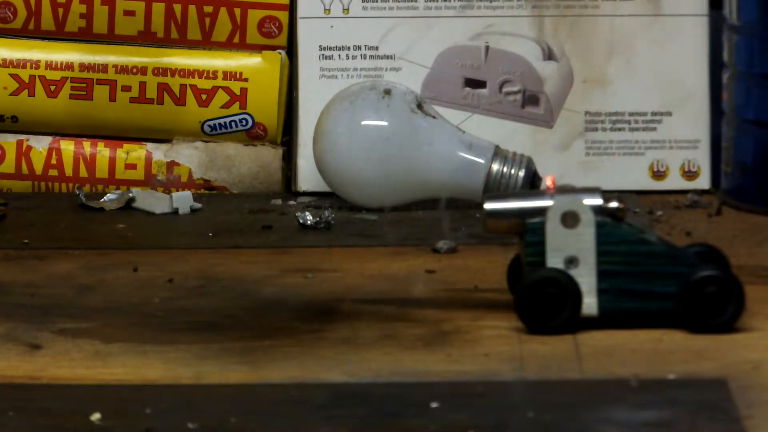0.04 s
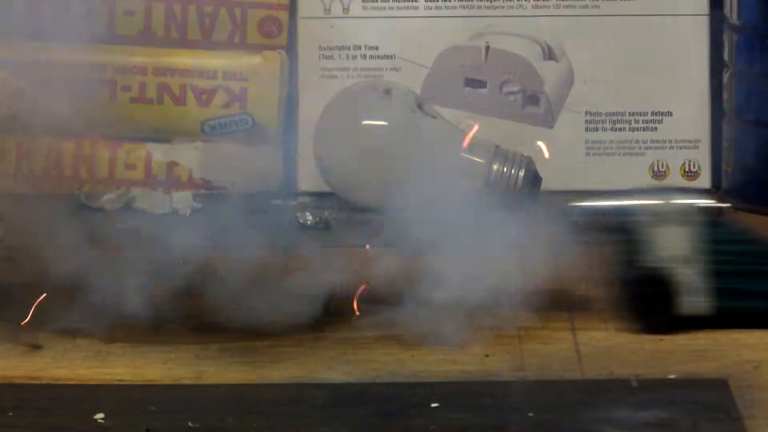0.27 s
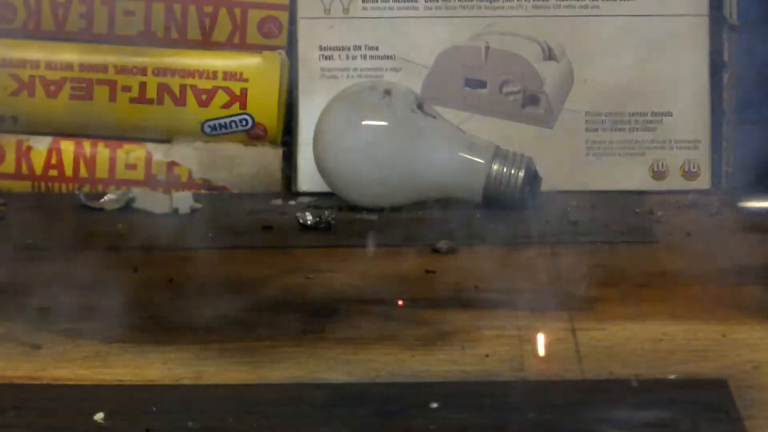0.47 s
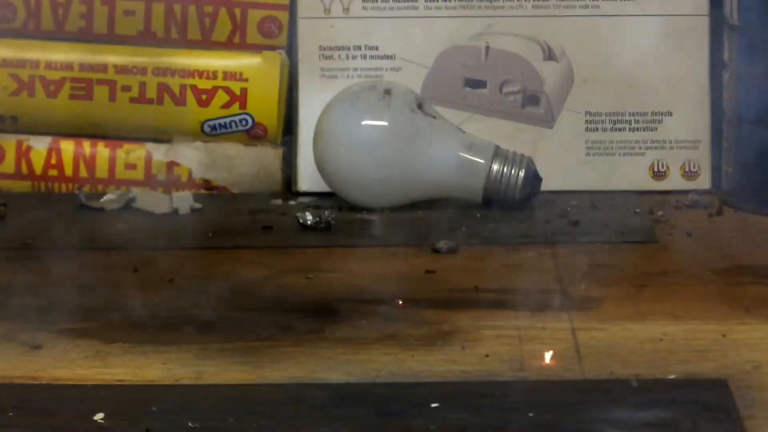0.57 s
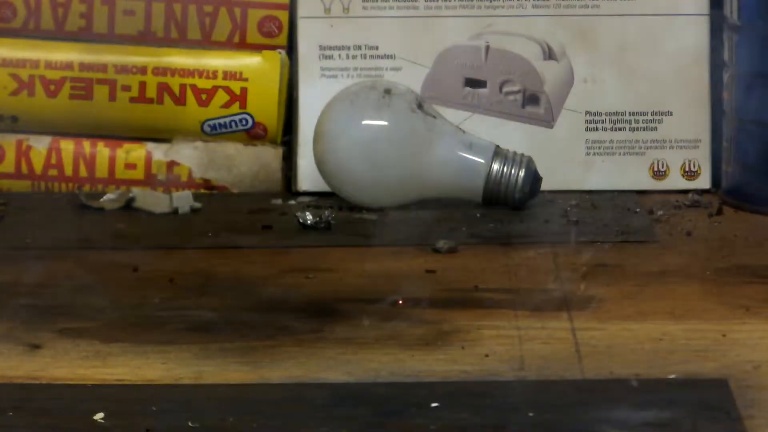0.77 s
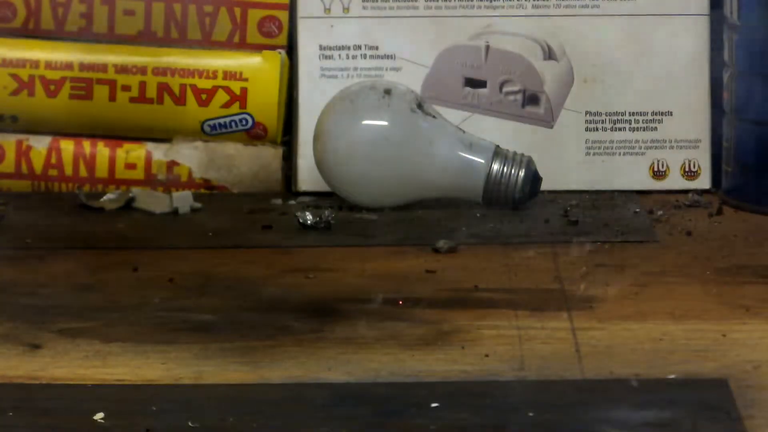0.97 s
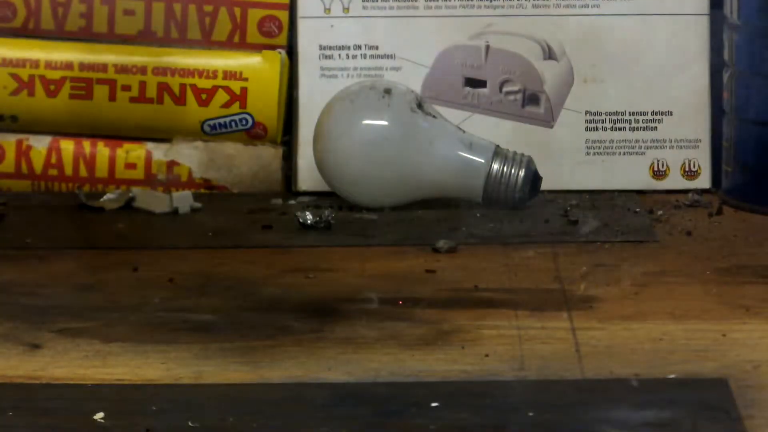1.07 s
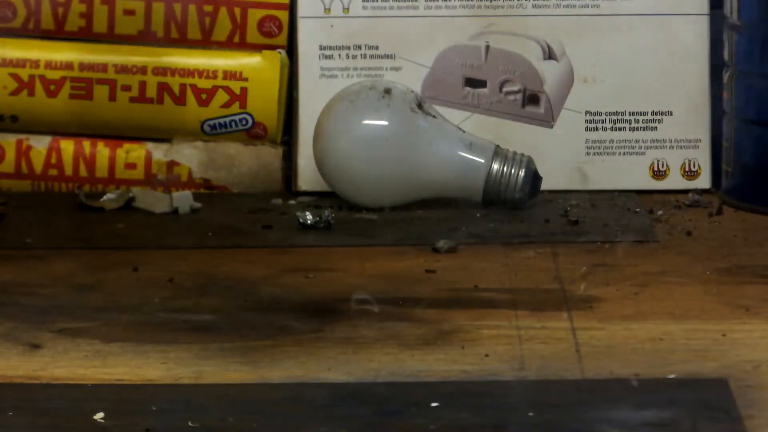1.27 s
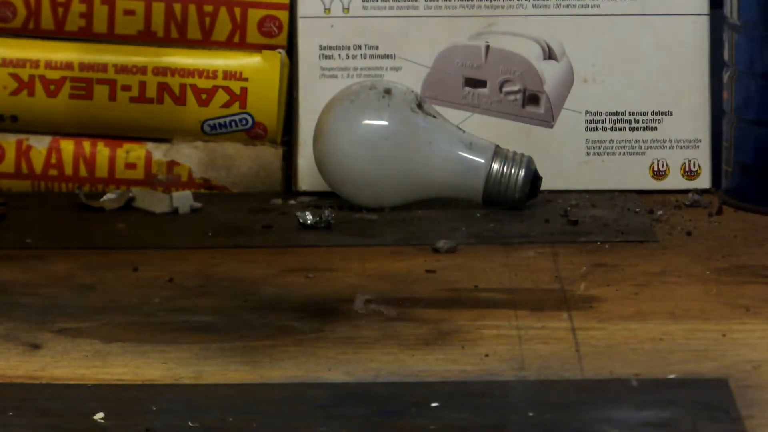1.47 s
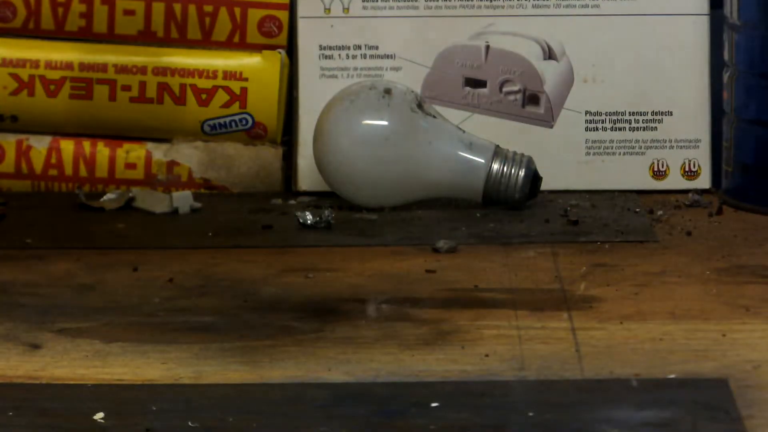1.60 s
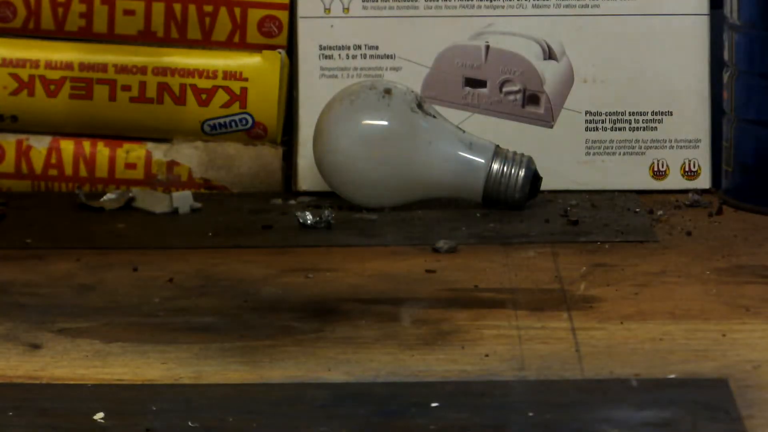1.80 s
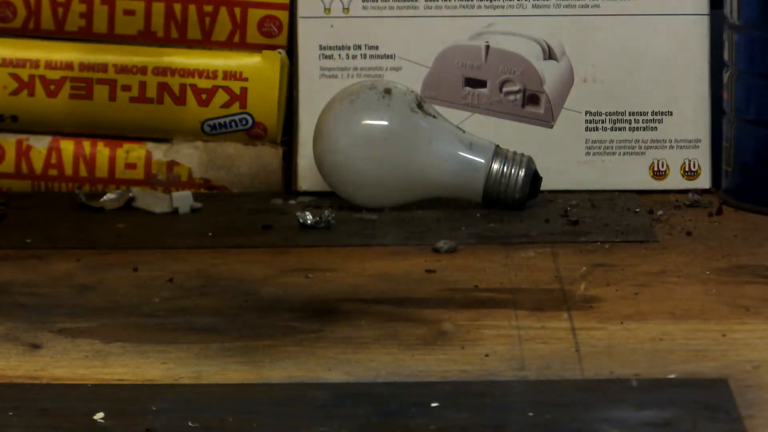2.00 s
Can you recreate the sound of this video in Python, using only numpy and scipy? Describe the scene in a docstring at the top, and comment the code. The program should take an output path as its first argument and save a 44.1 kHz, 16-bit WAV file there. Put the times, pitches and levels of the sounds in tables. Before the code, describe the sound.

A toy cannon fires one loud, slightly distorted bang on a workshop bench, close to the microphone, after a brief faint fuse fizz. A low boom fades through the room while sparks tick, metal chinks and embers hiss.

```python
"""A toy black-powder cannon on a workshop bench, close to a camera's stereo microphone.
First the fuse fizzes and pops twice over faint room tone. Gas jets out, and at once the blast
overloads the input; the gain control ducks, then recovers as a long boom fills the room and a low
hum swells and sinks. While the boom dies, sparks and grit tick on the bench, a bit of metal
chinks three times and the embers hiss away."""
import sys
import numpy as np
from scipy import signal
from scipy.fft import rfft, irfft
from scipy.io import wavfile
from scipy.ndimage import uniform_filter1d

SR = 44100
rng = np.random.default_rng(int(sys.argv[2]) if len(sys.argv) > 2 else 0)


def materialize(psi):
    """Save the field psi as 16-bit PCM at rate SR to the path in sys.argv[1].

    A 1-D psi becomes a single channel; in a 2-D psi each row is a channel.
    """
    bounded = np.clip(np.atleast_2d(psi).T, -1, 1)
    quanta = np.round(bounded * 32767).astype(np.int16)
    wavfile.write(sys.argv[1], SR, quanta)


N = 90404
SHOT_S = .2245

# Spectra of the noise layers: (frequency [Hz], relative density [dB])
ROOM_TONE_COLOUR = [(18, -44), (30, -1), (127, -5.5), (156, -1.5), (188, -9.5), (264, 4), (879, -9),
                    (1520, -9.5), (1880, -9.5), (3090, -16.5), (15600, -31.5)]
BOOM_COLOUR = [(24, -61), (40, -54), (127, -21), (153, -8.5), (253, -8.5), (401, 2.5), (836, -1.5),
               (1120, -13), (1890, -21), (2700, -33.5), (6000, -32.5), (7800, -70), (13200, -120)]
CRACK_COLOUR = [(100, -19.5), (500, -6.5), (1000, -2), (4000, -11), (8000, -7), (15800, -29)]
BLAST_COLOUR = [(24, -48), (40, -18), (162, -22), (302, -1.5), (707, -1.5), (954, -4), (1190, -2),
                (2180, -12), (11000, -18), (15600, -21)]
FIZZ_COLOUR = [(2000, -30), (5000, 2), (9000, 4.5), (15800, 2)]
# Likeness of left and right at the microphone: (frequency [Hz], correlation [0-1])
AIR_LIKENESS = [(60, 0.65), (150, 0.75), (380, 0.83), (950, 0.57), (2380, 0.45), (5980, 0.21), (15000, 1)]
BOOM_LIKENESS = [(60, 0.42), (180, 0.88), (550, 0.99), (1650, 1), (4970, 0.25), (15000, 1)]
BLAST_LIKENESS = [(60, 0.94), (180, 0.91), (550, 0.99), (1650, 1), (4970, 0.95), (15000, 0.9)]
CRACK_LIKENESS = [(40, 0), (16000, 0)]
# Time each band takes to fall 60 dB: (frequency [Hz], t60 [s])
BOOM_DECAY = [(60, 1.3), (160, 3.25), (400, 2.1), (800, 2.07), (1500, 2.14), (4000, 1.43)]
BLAST_DECAY = [(60, 0.22), (300, 0.4), (1000, 0.98), (2000, 0.99), (3000, 0.73), (5000, 0.67), (8000, 0.59),
               (15000, 0.28)]
# Hiss, one list for the fuse and one for the embers: (time [s], level [dB])
FIZZ_LEVELS = [
    [(0, -55), (.21, -55.5)],
    [(.6, -54), (.7, -51), (.8, -58), (1.02, -59.5), (1.15, -64), (1.24, -58), (1.31, -61), (1.4, -54),
     (1.48, -56.5), (1.55, -60), (1.7, -60.5), (1.81, -63.5), (2.05, -68)],
]
# Fuse pops and metal chinks: (time [s], level [dB])
FUSE_POPS = [(0.0121, -33), (0.112, -32.5)]
METAL_CHINKS = [(0.5616, -26), (0.6714, -35), (0.6928, -27.5)]
# Their resonances: (frequency [Hz], level [dB], t60 [s])
POP_MODES = [(1620, -0.5, .012), (3200, 2.5, .012), (3830, 0, 0.0069), (8440, 0, 0.0054)]
CHINK_MODES = [(5400, -1.5, 0.12), (5970, -1.5, 0.082), (6200, -9, 0.061), (8100, -12, 0.055)]
# Sparks and grit on the bench: (time [s], level [dB], left minus right [dB], brightest frequency [Hz])
GRIT_TICKS = [(.544, -27, 0, 13200), (0.639, -29, -1, 11000), (0.649, -43, 4, 13940),
              (0.726, -33.5, 0, 13000), (0.811, -41, 0.5, 8860), (.865, -47, 5, 9300), (.9, -44, 5, 8430),
              (0.963, -41, -1.5, 7440), (1.05, -31.5, 2, 9000), (1.101, -37.5, 7, 11400),
              (1.18, -39, -9, 12030), (1.194, -35, -4, 3860), (1.222, -41, 8, 7900), (1.238, -39, 0, 8600),
              (1.253, -39.5, -3, 4940), (1.294, -44, 0, 9080), (1.327, -36.5, 3, 7100),
              (1.4, -48, -2, 9000), (1.414, -46, 5, 8400), (1.464, -51.5, -2, 13200),
              (1.7315, -40.5, -1, 3000), (1.821, -46, -2, 8600)]
# Course of the low hum: (time [s], frequency [Hz], level [dB])
HUM_PATH = [(0.0, 152.6, -58), (0.11, 161.8, -54), (0.21, 171.7, -59), (0.23, 176, -36), (0.23, 179, -28),
            (0.3, 172.5, -36), (0.36, 163.6, -45), (0.51, 156.6, -24), (0.59, 160.4, -29.5),
            (0.7, 163.1, -39.5), (0.81, 163, -35.5), (0.99, 159.2, -45.5), (1.07, 158.0, -37),
            (1.14, 158, -49.5), (1.2, 159, -46), (1.29, 156.5, -58.5), (1.35, 158.7, -40),
            (1.53, 155.4, -52.5), (1.62, 160.3, -48.5), (1.82, 169.8, -60), (1.9, 159.8, -48),
            (2.05, 158.1, -48)]
# Soft puffs: (time [s], length [s], level [dB], low edge [Hz], high edge [Hz])
NOISE_PUFFS = [(.232, .07, -5, 300, 1970), (.36, .16, -20, 570, 3860), (1.46, .1, -51, 900, 2400),
               (1.68, .16, -48, 88, 120), (0.53, 0.11, -34, 63, 120)]
# Resonances of the workshop: (frequency [Hz], width [Hz], level [dB])
ROOM_MODES = [(105.8, 2.7, -14), (265.5, 4.5, -8.5), (297.6, 5.3, -5), (360.5, 3.4, 3), (406.5, 2.9, 4.5),
              (449.3, 7.4, 1), (498, 1.7, 2), (547, 3.6, 0), (591, 5.5, 2.5), (603.3, 2.2, -0.5),
              (634.5, 7.2, 0.5), (675, 6, -3), (784.5, 7.4, -6.5), (839.6, 3.8, -4)]
# Swells of the boom on top of its decay: (time [s], level [dB])
BOOM_SWELLS = [(.23, -9), (.3, -9), (.4, -13.5), (.52, -4.5), (.62, -7.5), (.75, -8), (.8, -12),
               (1.05, -8.5), (1.12, -11), (1.45, -8), (1.52, -5), (1.62, -6.5), (2.05, -4.5)]


def amp(db):
    return 10 ** (np.asarray(db) / 20)


def unit_rms(x):
    return x / np.sqrt(np.mean(x ** 2) + 1e-20)


def over_frequency(points, hz):
    f, value = np.transpose(points)
    return np.interp(np.log(hz + 1), np.log(f + 1), value)


def over_time(points):
    s, value = np.transpose(points)
    return np.interp(np.arange(N) / SR, s, value)


def add(mix, start_s, sound):
    part = mix[..., round(start_s * SR):][..., :sound.shape[-1]]
    part += sound[..., :part.shape[-1]]


def noise_field(colour, likeness, decay=None, flicker_db=0., size=256):
    """Coloured stereo noise; given a decay table, each band dies from the first sample on."""
    hop = size // 4
    frames, hz = N // hop + 5, np.fft.rfftfreq(size, 1 / SR)
    a, b, c, d, flicker = rng.standard_normal((frames, len(hz), 5)).T
    shared = over_frequency(likeness, hz)[:, None]
    left = a + 1j * b
    right = shared * left + np.sqrt(1 - shared ** 2) * (c + 1j * d)
    flicker = unit_rms(uniform_filter1d(uniform_filter1d(flicker, 8, axis=0), 6, axis=1))
    bands = np.array([left, right]) * amp(over_frequency(colour, hz)[:, None] + flicker_db * flicker)
    rms = np.sqrt(np.mean(signal.istft(bands, nperseg=size, noverlap=size - hop)[1] ** 2))
    if decay:
        bands *= amp(-60 * np.arange(frames) * hop / SR / over_frequency(decay, hz)[:, None])
    return signal.istft(bands, nperseg=size, noverlap=size - hop)[1][:, :N] / rms


def room_tone():
    """The faint, mostly low noise of the workshop around the microphone."""
    return amp(-51) * noise_field(ROOM_TONE_COLOUR, AIR_LIKENESS, flicker_db=1.5, size=1024)


def fizz():
    """The burning fuse, and later the embers, give a thin flickering hiss."""
    fuse, embers = FIZZ_LEVELS
    return amp(over_time(fuse + embers)) * noise_field(FIZZ_COLOUR, AIR_LIKENESS, flicker_db=3)


def ringing_bits(events, modes, rise_s=.00054, chatter_s=.0015):
    """Each pop or chink strikes a few modes, which ring roughly as the small bits chatter."""
    t, out = np.arange(8000) / SR, np.zeros(N)
    for start_s, level_db in events:
        noise = rng.standard_normal((len(modes), len(t)))
        chatter = unit_rms(uniform_filter1d(noise, round(chatter_s * SR), axis=1))
        ring = sum(amp(level_db + db - 6.5 - 60 * t / t60) * grain * np.sin(2 * np.pi * hz * t)
                   for (hz, db, t60), grain in zip(modes, chatter))
        add(out, start_s, np.minimum(t / rise_s, 1) * ring)
    return out


def grit_ticks(snap_s=.00051, width_octaves=.69, wash_t60_s=.2):
    """Sparks and grit hit the bench to left and right: each a bright snap, then a faint wash."""
    t, out = np.arange(6000) / SR, np.zeros((2, N))
    octave = np.log2(np.fft.rfftfreq(len(t), 1 / SR) + 1)
    shelf = amp(-2.5) * (octave > 11.3)  # above about 2.5 kHz
    snap, wash = np.exp(-t / snap_s), amp(-20 - 60 * t / wash_t60_s)
    for start_s, db, pan_db, hz in GRIT_TICKS:
        colour = np.exp(-.5 * ((octave - np.log2(hz)) / width_octaves) ** 2) + shelf
        noise = irfft(rfft(rng.standard_normal(len(t))) * colour)
        noise /= np.sqrt(np.average(noise ** 2, weights=snap ** 2))
        add(out, start_s, amp([[db + pan_db / 2], [db - pan_db / 2]]) * noise * (snap + wash))
    return out


def hum():
    """One low tone in the room wavers, swells and sinks."""
    s, hz, db = np.transpose(HUM_PATH)
    t = np.arange(N) / SR
    phase = 2 * np.pi * np.cumsum(np.interp(t, s, hz)) / SR
    return np.sqrt(2) * amp(np.interp(t, s, db)) * np.sin(phase)


def puffs():
    """Short rushes and rumbles of band noise swell and sink smoothly."""
    out = np.zeros(N)
    for start_s, length_s, db, low_hz, high_hz in NOISE_PUFFS:
        bandpass = signal.butter(2, [low_hz, high_hz], "band", fs=SR, output="sos")
        rush = unit_rms(signal.sosfilt(bandpass, rng.standard_normal(12000)))
        n = round(length_s * SR)
        add(out, start_s, amp(db) * np.hanning(n) * rush[-n:])
    return out


def room_boom(modes_db=-3.5, modes_t60_s=2.725):
    """The workshop answers the shot: a low, slowly dying wash with narrow room modes wavering in it."""
    t, modes, out = np.arange(N) / SR, np.zeros(N), np.zeros((2, N))
    for hz, width_hz, db in ROOM_MODES:
        radius = np.exp(-np.pi * width_hz / SR)
        resonator = [1, -2 * radius * np.cos(2 * np.pi * hz / SR), radius ** 2]
        modes += amp(db) * unit_rms(signal.lfilter([1], resonator, rng.standard_normal(N)))
    add(out, SHOT_S, noise_field(BOOM_COLOUR, BOOM_LIKENESS, BOOM_DECAY, size=1024))
    add(out, SHOT_S, amp(modes_db - 60 * t / modes_t60_s) * unit_rms(modes))
    return out * amp(over_time(BOOM_SWELLS))


def cannon_blast(rise_s=.00071, thump_hz=108.7, thump_t60_s=.13, crack_s=.017, jet_s=.0045):
    """The shot at close range: gas jets out just ahead of a short, wide crack, thump and wall of noise."""
    t, out = np.arange(N) / SR, np.zeros((2, N))
    wall = np.minimum(t / rise_s, 1) * noise_field(BLAST_COLOUR, BLAST_LIKENESS, BLAST_DECAY)
    thump = amp(-60 * t / thump_t60_s) * np.sin(2 * np.pi * thump_hz * t)
    add(out, SHOT_S, amp(3.5) * wall + amp(-10) * thump)
    crack = noise_field(CRACK_COLOUR, CRACK_LIKENESS)[:, :round(crack_s * SR)]
    add(out, SHOT_S, amp(-11) * signal.windows.tukey(crack.shape[1], .3) * crack)
    jet_ramp = t[:round(jet_s * SR)] / jet_s
    add(out, SHOT_S - jet_s, amp(-13) * jet_ramp * rng.standard_normal(len(jet_ramp)))
    return out


def scene():
    """All that reaches the microphone beside the bench."""
    room = (room_boom() + hum() + puffs()) * amp([[-.73], [.73]])  # leans a little to the right
    return (cannon_blast() + room + room_tone() + fizz() + grit_ticks()
            + ringing_bits(FUSE_POPS, POP_MODES) + ringing_bits(METAL_CHINKS, CHINK_MODES))


def record(dry, threshold_db=-18.5, duck_share=.57, sense_s=.0028, hold_s=.079, ceiling=.77):
    """The camera's gain control ducks too late for the blast, which saturates; it holds, then recovers."""
    fall_db_per_s, recover_db_per_s = 126, 80
    step = 44  # samples between gain updates
    smoothing = 1 / (sense_s * SR)
    power = signal.lfilter([smoothing], [1, smoothing - 1], (dry ** 2).mean(0))[::step]
    target_db = duck_share * np.maximum(10 * np.log10(power + 1e-12) - threshold_db, 0)
    hold, duck_db = round(hold_s * SR / step), np.zeros(len(target_db))
    for k in range(1, len(target_db)):
        gap_db = target_db[max(k - hold, 0):k + 1].max() - duck_db[k - 1]
        move_db = np.clip(gap_db, -recover_db_per_s * step / SR, fall_db_per_s * step / SR)
        duck_db[k] = duck_db[k - 1] + move_db
    ducked = dry / amp(np.interp(np.arange(N), np.arange(len(duck_db)) * step, duck_db))
    saturated = ceiling * np.tanh(ducked / ceiling)
    low_cut = signal.butter(2, 67, "high", fs=SR, output="sos")
    high_cut = signal.firwin(511, 15700, window=("kaiser", 9), fs=SR)
    return signal.oaconvolve(signal.sosfilt(low_cut, saturated), high_cut[None], "same")


dry = scene()
out = record(dry)
materialize(out)
```